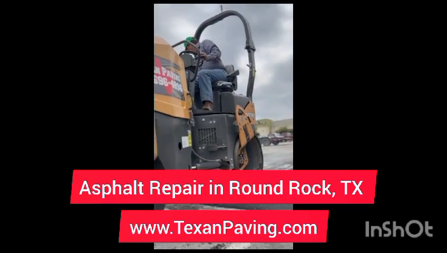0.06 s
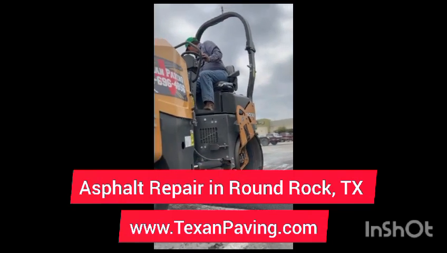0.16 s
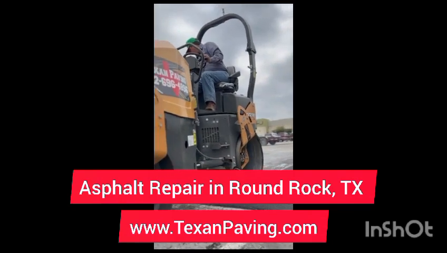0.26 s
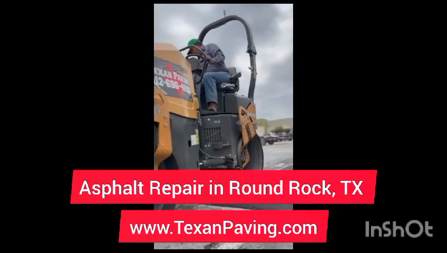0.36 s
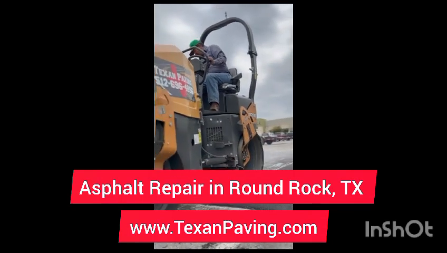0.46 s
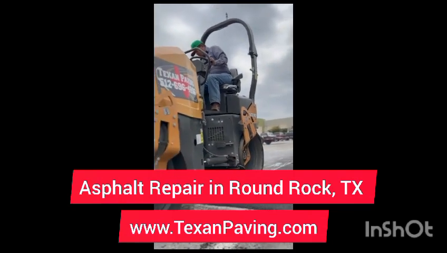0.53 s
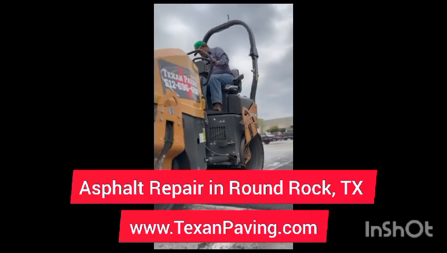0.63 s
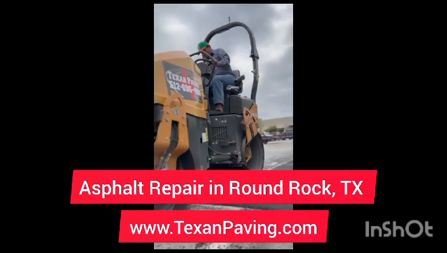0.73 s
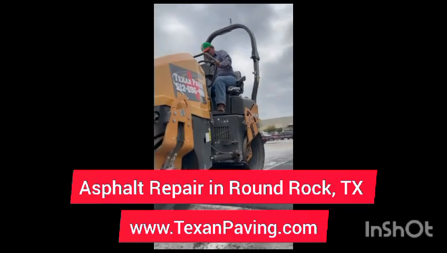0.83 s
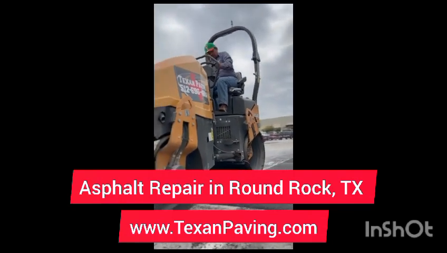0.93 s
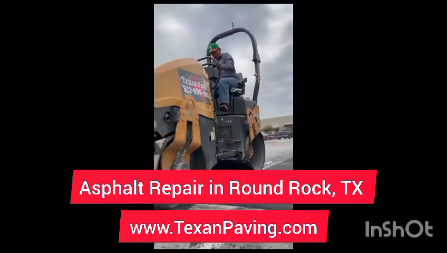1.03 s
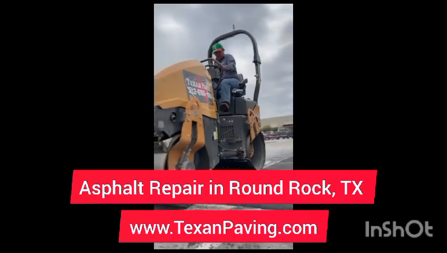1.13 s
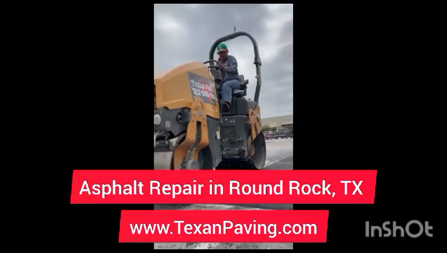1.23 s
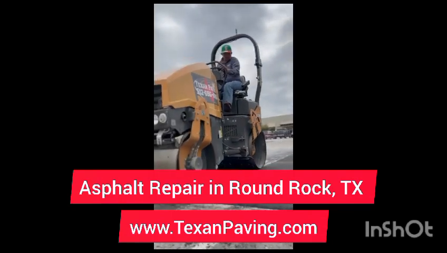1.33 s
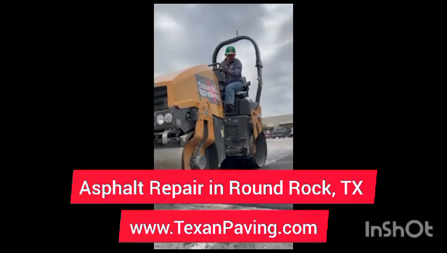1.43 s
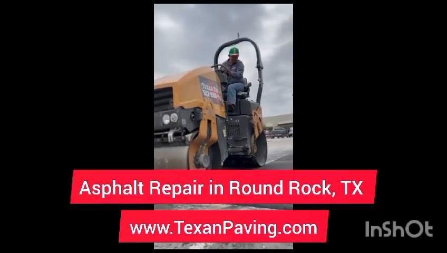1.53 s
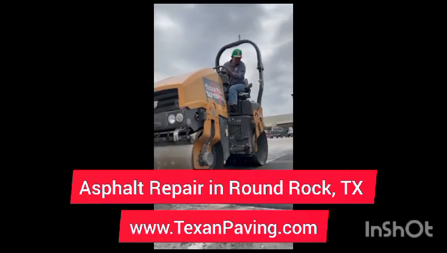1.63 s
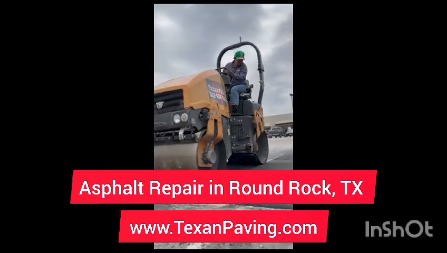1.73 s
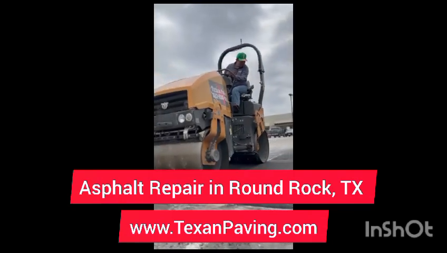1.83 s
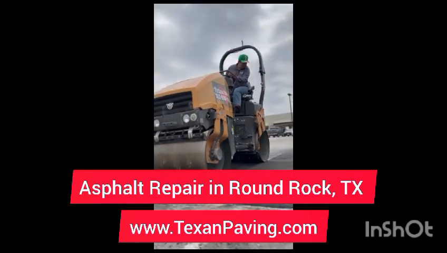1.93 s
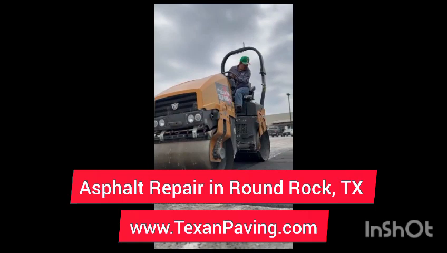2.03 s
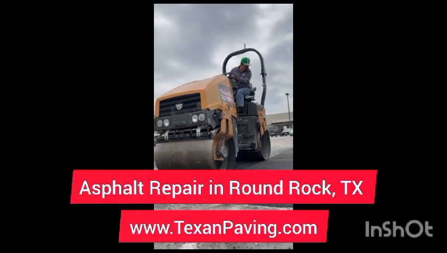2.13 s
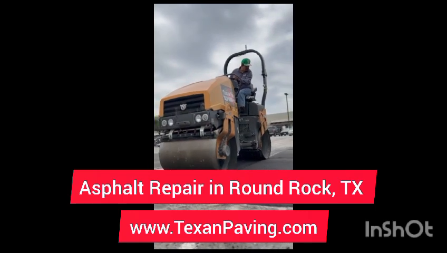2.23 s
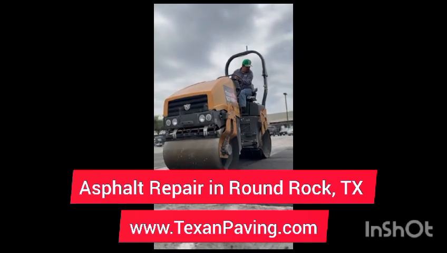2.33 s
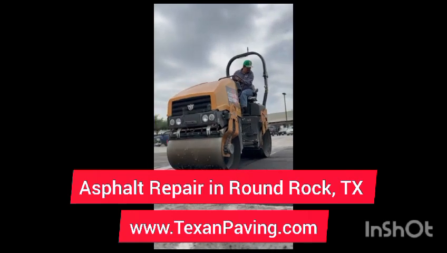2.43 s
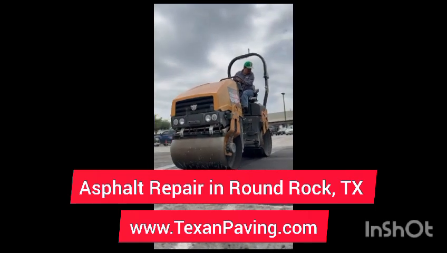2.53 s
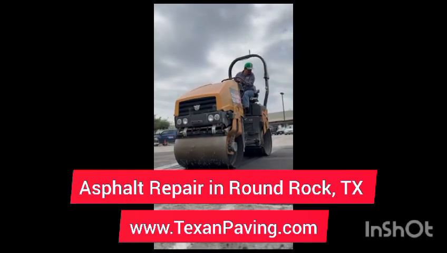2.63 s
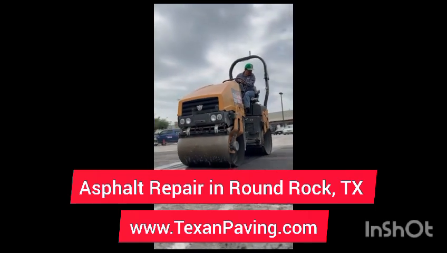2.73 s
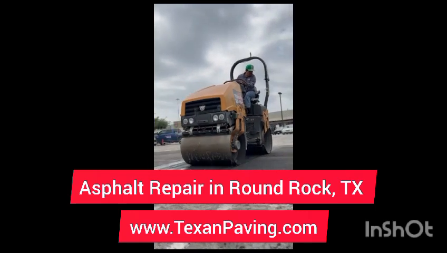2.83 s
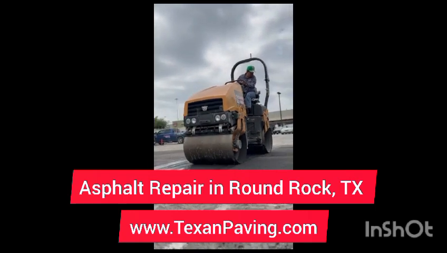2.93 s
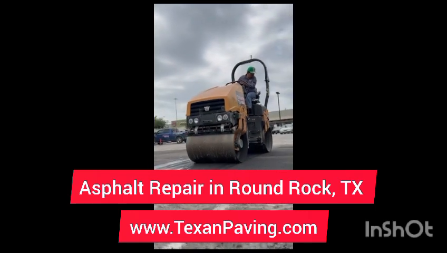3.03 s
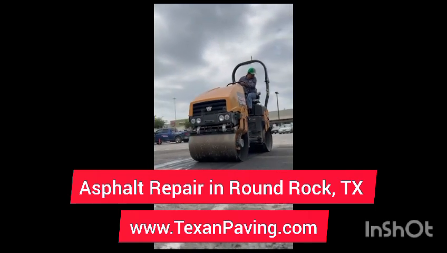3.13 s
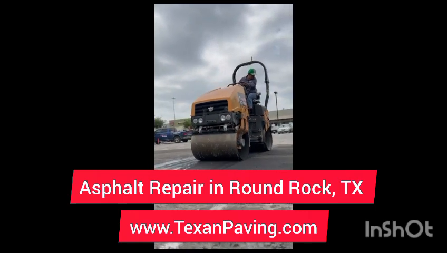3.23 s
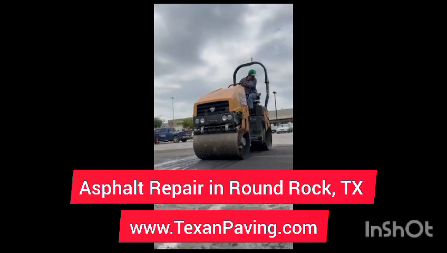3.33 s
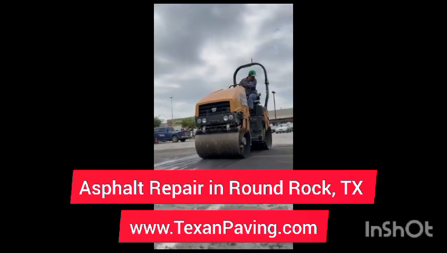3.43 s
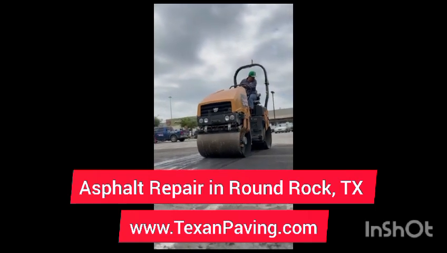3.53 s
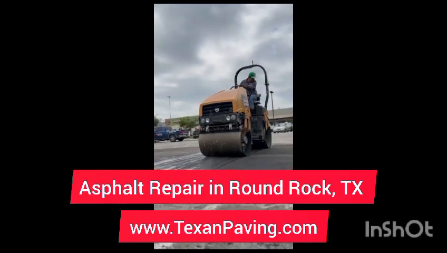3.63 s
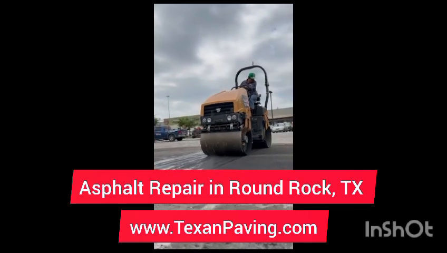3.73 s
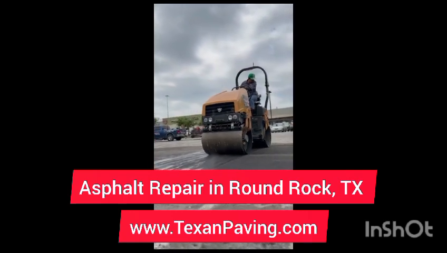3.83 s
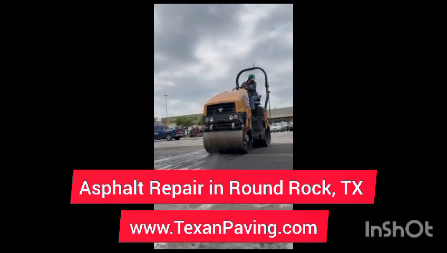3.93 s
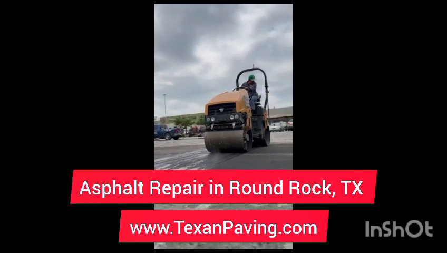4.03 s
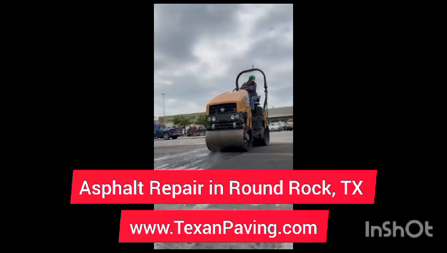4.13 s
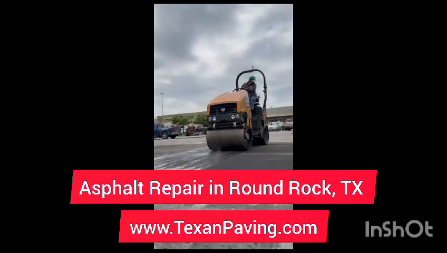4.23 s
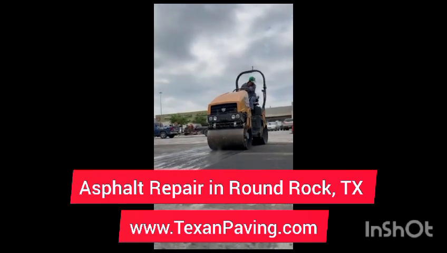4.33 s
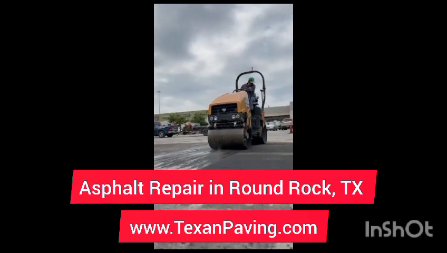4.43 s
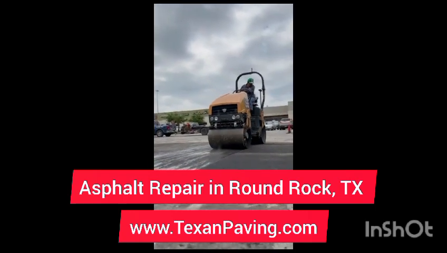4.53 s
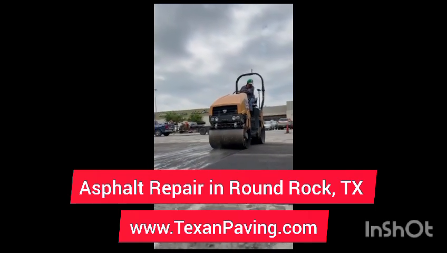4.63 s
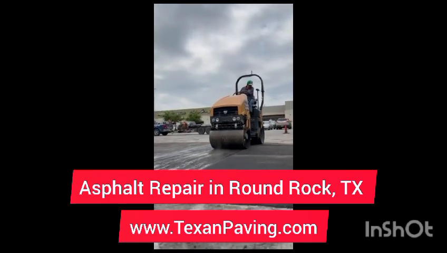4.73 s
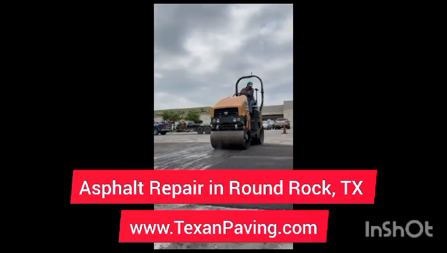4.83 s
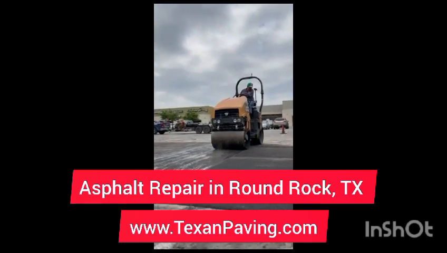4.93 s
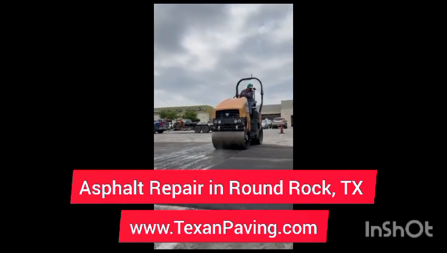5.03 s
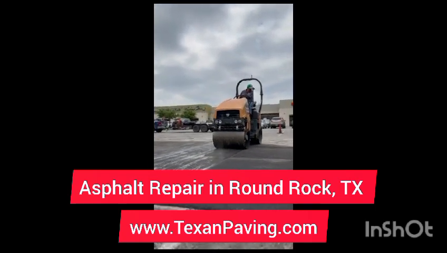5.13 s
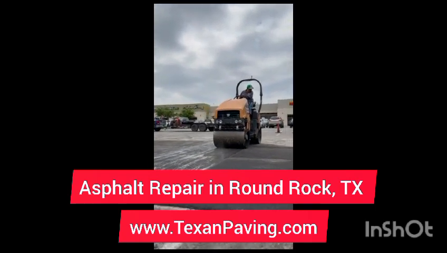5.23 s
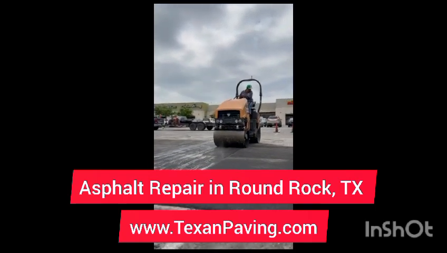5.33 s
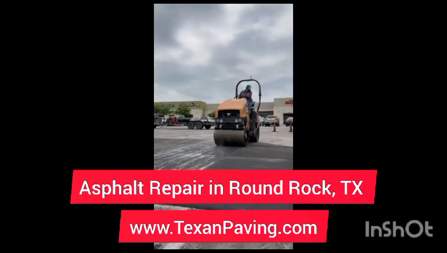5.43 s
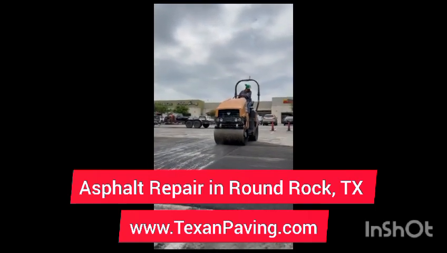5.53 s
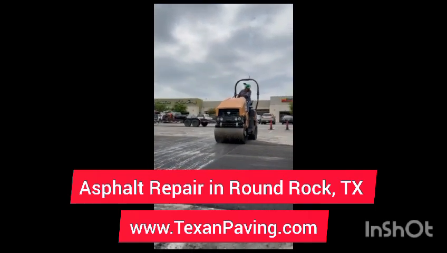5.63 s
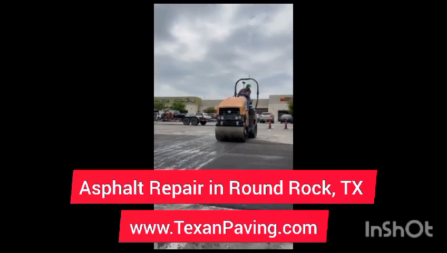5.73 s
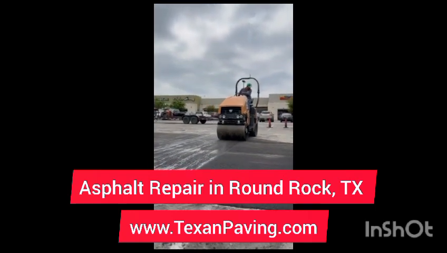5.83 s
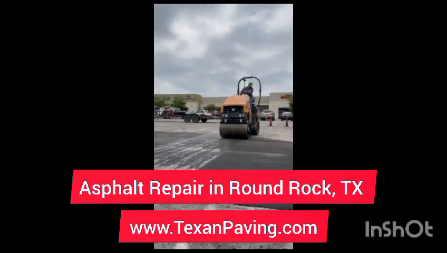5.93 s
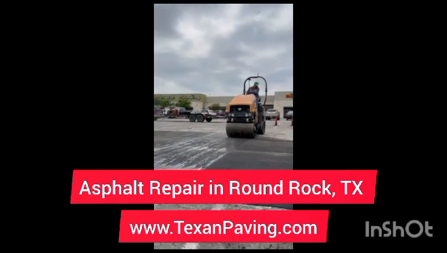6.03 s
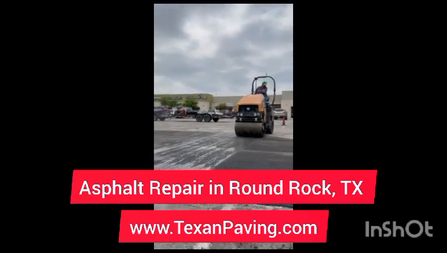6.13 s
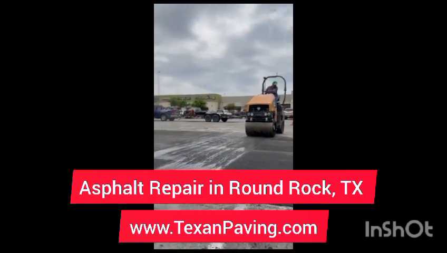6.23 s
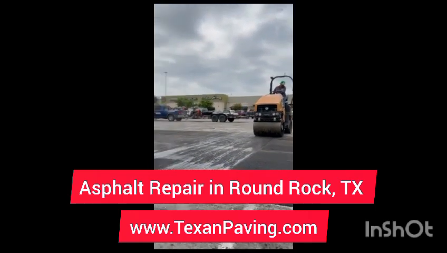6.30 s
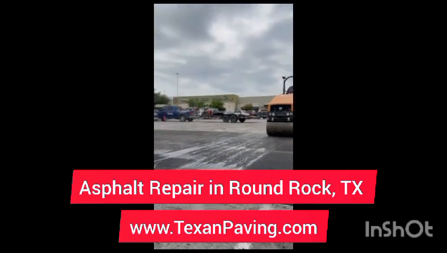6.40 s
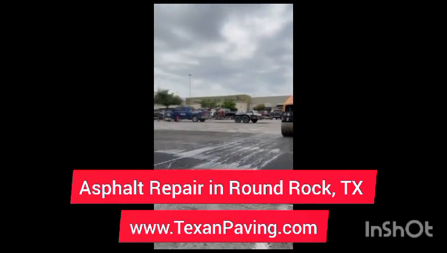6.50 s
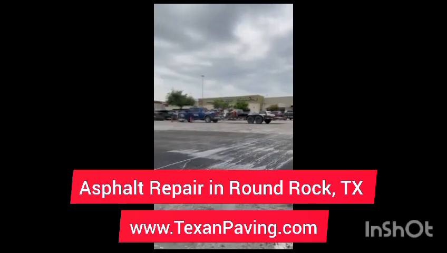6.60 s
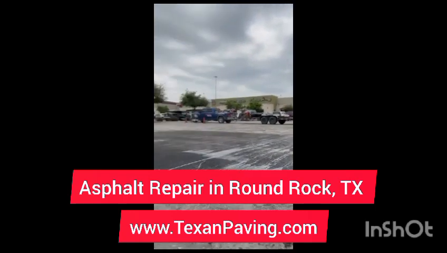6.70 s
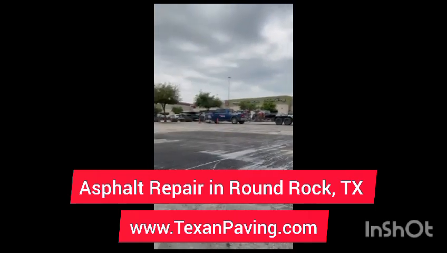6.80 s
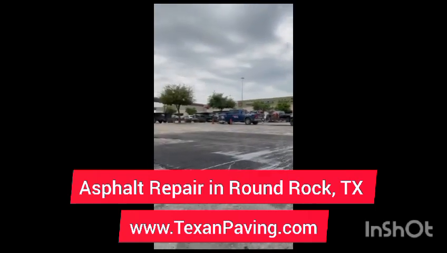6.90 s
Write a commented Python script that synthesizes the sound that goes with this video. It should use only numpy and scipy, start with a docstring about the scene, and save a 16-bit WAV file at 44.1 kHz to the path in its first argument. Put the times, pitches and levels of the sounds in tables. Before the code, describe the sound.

Loud clattering diesel hum and pump whine give way to knocks, a rising drum rumble and a deep pulsing throb outdoors.

```python
"""A diesel road roller idles beside two microphones with its drive pump whining loudly.
Its engine rate droops under load, it backs away, the front vibrating drum runs up amid knocks and
the rear drum's thump joins in; engine and drum tones beat into a throb over clatter and a noisy roar.
Late on, the rear drum meets stiff ground, panels buzz harder and passing tones sound.
Tones are summed cosines, the rest is shaped noise and short rings; another machine drones throughout."""
import sys
import numpy as np
from scipy import signal
from scipy.fft import rfft, irfft
from scipy.io import wavfile
from scipy.ndimage import uniform_filter1d

SR = 44100
rng = np.random.default_rng(int(sys.argv[2]) if len(sys.argv) > 2 else 0)


def transcribe(u):
    """Save the signal u as a 16-bit wav file named by the first command-line argument.

    u: samples, shape (n,) or (channels, n), limited to [-1, 1]; the rate is SR.
    q: integer samples, one column per channel.
    """
    v = np.clip(np.atleast_2d(u).T, -1, 1)
    q = np.round(v * 32767).astype(np.int16)
    wavfile.write(sys.argv[1], SR, q)


N = 306936


def undb(db):
    """Turn decibels into a plain factor."""
    return 10 ** (np.asarray(db) / 20)


def joined_db(*levels_db):
    """Level in dB when the plain factors of several levels are added."""
    return 20 * np.log10(sum(undb(db) for db in levels_db))


def curves(table):
    """Columns of a table after its time column, one value a sample."""
    s, *columns = np.transpose(table)
    return [np.interp(np.arange(N) / SR, s, column) for column in columns]


def ramp(start, end):
    """Rise from 0 to 1 between two times in seconds."""
    return np.clip((np.arange(N) / SR - start) / (end - start), 0, 1)


def on_bins(points):
    """Read (Hz, value) points at every frequency bin of the spectrum."""
    hz, value = np.transpose(points)
    bin_hz = np.arange(N // 2 + 1) * SR / N
    return np.interp(np.log(bin_hz + 1), np.log(hz + 1), value)


def walk(rate):
    """Slow random curve: values held for 1 / rate seconds and smoothed twice; spread near 1."""
    k = int(SR / rate)
    steps = np.repeat(rng.standard_normal(N // k + 1), k)
    return 1.305 * uniform_filter1d(uniform_filter1d(steps, k), k)[:N]


def tone(turns, db):
    """Cosine at an rms level in dB; one turn is one wave."""
    return np.sqrt(2) * undb(db) * np.cos(2 * np.pi * turns)


def coloured(points):
    """Noise of rms 1 with the given spectrum."""
    noise = irfft(rfft(rng.standard_normal(N)) * undb(on_bins(points)), N)
    return noise / noise.std()


def band(x, lo_hz, hi_hz):
    """Let through mainly what lies between two frequencies."""
    return signal.sosfilt(signal.butter(1, [lo_hz, hi_hz], "band", fs=SR, output="sos"), x)


START_M, LEAVES_S, SPEED_M_S = 2.51, 0.72, 2.25  # nearest distance, start of the move, speed


def distance_loss():
    """Sound spreads out with distance: dB lost as the machine backs away."""
    away = SPEED_M_S * np.maximum(np.arange(N) / SR - LEAVES_S, 0)
    return 20 * np.log10(np.hypot(START_M, away) / START_M)


# the engine slows as the load comes on: (time [s], firing rate [Hz])
FIRING_RATE = [(0, 52.18), (.68, 52.24), (.82, 50.84), (1.3, 51.55), (1.55, 52.21), (1.9, 52.53),
               (2.4, 52.48), (3.4, 52.4), (5.4, 52.33), (5.9, 52.22), (6.96, 52.31)]
# off-centre weight that spins up, overshoots and settles: (time [s], turning rate [Hz])
FRONT_WEIGHT = [(1, 30.65), (1.1, 33.5), (1.3, 48.33), (1.4, 50.51), (1.6, 59.3), (1.72, 56.58),
                (1.9, 57.24), (3.3, 57.48), (4.3, 57.29), (5.3, 57.15), (6.96, 56.85)]
# slower weight: (time [s], turning rate [Hz])
REAR_WEIGHT = [(1.3, 51.49), (1.7, 52.16), (2, 50.17), (2.3, 51.19), (3.5, 50.86), (4.7, 50.65),
               (5.5, 50.76), (5.7, 49.2), (6.1, 50.0), (6.3, 49.52), (6.96, 50.1)]


def running_speeds():
    """Rates of the engine firings and of the spinning weights that shake the drums."""
    return [curves(table)[0] for table in (FIRING_RATE, FRONT_WEIGHT, REAR_WEIGHT)]


# deep noise: (frequency [Hz], relative density [dB])
RUMBLE_COLOUR = [(20, 3), (35, 8), (70, 13.5), (130, 7.5), (200, 4), (300, -26.5)]
RUMBLE_DB = -27.5


def rumble():
    """Deep noise whose level wavers a little."""
    return undb(RUMBLE_DB + 0.34 * walk(5.3)) * coloured(RUMBLE_COLOUR)


DRONE_HZ = 46.1
# tones of the drone: (multiple of the drone rate [1])
FAR_MULTIPLES = (3, 4, 5, 9, 11, 20)
# their mean levels: (level [dB])
FAR_DB = (-44, -38.5, -38, -44, -47, -55.5)


def far_drone():
    """Another machine turns steadily and sounds several multiples of its rate."""
    turns = np.cumsum(DRONE_HZ * (1 + 0.002943 * walk(1.5))) / SR
    return sum(tone(multiple * turns + rng.random(), db + 1.5 * walk(2.385))
               for multiple, db in zip(FAR_MULTIPLES, FAR_DB))


# (start [s], end [s], start pitch [Hz], end pitch [Hz], level [dB], waver [dB])
PASSING_TONES = [(5.68, 6.17, 419, 416, -35, 3), (6.25, 6.5, 418, 416, -37, 3),
                 (6.33, 6.95, 690, 730, -39, 5), (6.54, 6.84, 1292, 1300, -37.5, 2),
                 (6.66, 6.98, 505, 503, -36, 3), (6.68, 6.98, 420, 418, -36, 3)]


def passing_tones():
    """Thin gliding tones that come and go, unsteady in pitch and level."""
    t, out = np.arange(N) / SR, 0
    for start, end, hz, end_hz, db, waver_db in PASSING_TONES:
        pitch = hz + (end_hz - hz) * ramp(start, end) + 0.00588 * hz * walk(14)
        to_edge = np.minimum(t - start, end - t)
        fade = np.clip(to_edge / (0.22 * (end - start)), 0, 1)
        out = out + tone(np.cumsum(pitch) / SR, db + waver_db * walk(25)) * fade
    return out


# (start pitch [Hz], end pitch [Hz], width [Hz], level [dB], loudest time [s], fade [s])
ROUGH_WHINES = [(1590, 1640, 120, -33, 1.03, 0.15), (2016, 2100, 140, -37, 1.4, 0.249),
                (1796, 1870, 50, -37, 1.5, 0.246), (1078, 1150, 90, -39, 1.4, .4),
                (1810, 1780, 60, -41, 2.4, 0.47), (2076, 2095, 30, -42, 2.8, .5),
                (1364, 1390, 50, -40, 3.3, 0.66), (1226, 920, 56, -42, 2.3, 0.32),
                (1836, 1700, 90, -41.5, 4.4, .5), (1822, 1700, 120, -44, 5.3, 0.39),
                (1288, 1290, 40, -42, 5.15, 0.27), (3500, 3550, 250, -44, 2.5, 1.1),
                (2490, 2480, 150, -45.5, 2.5, 1.5), (185.3, 170, 27, -28.5, 5.9, 0.37),
                (250, 270, 30, -35, 6.4, 0.17), (559, 640, 90, -36, 6.4, .5),
                (705, 720, 70, -35, 6.45, 0.567)]


def whines():
    """Rough whines out of the roar: gliding tones shaken by slow noise as wide as their band."""
    t, out = np.arange(N) / SR, 0
    for hz, end_hz, width_hz, db, s, fade in ROUGH_WHINES:
        turns = np.cumsum(hz + (end_hz - hz) * ramp(s - fade, s + fade)) / SR
        shaken = walk(width_hz) * np.cos(2 * np.pi * turns) + walk(width_hz) * np.sin(2 * np.pi * turns)
        out = out + shaken * undb(db - 9 * ((t - s) / fade) ** 2)
    return out


# how much of the clatter returns each engine cycle: (frequency [Hz], share [0 to 1])
RECURRING_SHARE = [(250, .5), (400, .8), (570, .75), (620, .25), (800, .4), (900, .75), (1500, .75),
                   (1900, .4), (5000, .4)]


def cycle_noise(firing):
    """Spectrum of noise that partly recurs every three firings; the recurring pattern slowly changes."""
    size = 2530  # samples in the pattern
    place = (firing / 3 % 1 * size).astype(int)
    drift = np.pi * .7 * np.arange(N) / SR
    pattern = rng.standard_normal((2, size))[:, place]
    recurring = np.cos(drift) * pattern[0] + np.sin(drift) * pattern[1]
    share = on_bins(RECURRING_SHARE)
    return np.sqrt(share) * rfft(recurring) + np.sqrt(1 - share) * rfft(rng.standard_normal(N))


ROAR_DB, ROAR_LOSS = -27, 0.65  # before distance, at 1.5 kHz; share of the distance loss
LOW_LOSS, HISS_LOSS = -0.39, 0.23  # extra shares of the loss at 500 Hz and 4 kHz
WIND_UP_S, WIND_UP_DB = (0, 1.78), -4  # the roar grows as the machine sets off
# top treble over the roar: (time [s], level [dB])
TOP_TREBLE = [(0, 5), (1.6, 2.5), (4.1, 2.5), (4.8, -8), (5.2, 0), (5.65, -19), (6.1, -3.5), (6.96, 6)]


def roar_levels(loss_db):
    """Whole roar, then extra changes of its low, hiss and top parts, as they fade unequally."""
    whole = ROAR_DB + WIND_UP_DB * (1 - ramp(*WIND_UP_S)) - ROAR_LOSS * loss_db
    return whole, -LOW_LOSS * loss_db, -HISS_LOSS * loss_db, curves(TOP_TREBLE)[0]


# roar of the engine bay at the side: (frequency [Hz], relative density [dB])
BAY_COLOUR = [(150, -28.5), (250, 0.5), (400, -5), (520, -16), (750, 2), (1000, -11.5), (1850, -11),
              (3100, -14.5), (3600, -25.5), (5000, -26), (5900, -27), (7800, -19), (8800, -38),
              (11500, -65)]
# roar of the grille in front: (frequency [Hz], relative density [dB])
GRILLE_COLOUR = [(150, -18), (250, -1.5), (370, -5), (520, -3.5), (870, -14.5), (1100, -10.5), (1850, -10),
                 (2500, -15.5), (3100, -19), (3600, -20.5), (5000, -24.5), (5900, -22.5), (7800, -28.5),
                 (8800, -29.5), (11500, -53)]
TURN_S = (1, 3.2)  # the machine swings from side-on to face-on
CLATTER_LAG = .13  # turns by which the clatter slips from one octave to the next
SLOW_SWELL_DB = (1.2, .4)  # slow swell below 1.5 kHz and in the treble


def roar(firing, db, low_db, hiss_db, top_db):
    """Fan and rolling noise in bands that swell apart; clatter pulses with each firing."""
    noise = cycle_noise(firing)
    octaves = np.log2(np.arange(len(noise)) * SR / N + 1)
    side, front = undb(on_bins(BAY_COLOUR)), undb(on_bins(GRILLE_COLOUR))
    facing = ramp(*TURN_S)
    # one cylinder of three knocks harder
    harder = undb(2.5 * np.cos(2 * np.pi * firing / 3))
    out = 0
    for octave in np.arange(7.5, 14, .5):
        share = np.clip(1 - 2 * abs(octaves - octave), 0, 1)
        swing_db = 20 * np.log10(np.sum(share * side) / np.sum(share * front))
        # how far this band counts as low, hiss or top; 1.5 kHz is the neutral middle
        low, hiss, top = (np.interp(octave, np.log2([500, 1500, 4000, 8000]), np.eye(4)[k])
                          for k in (0, 2, 3))
        level_db = (1 - facing) * swing_db + low * low_db + hiss * hiss_db + top * top_db
        level_db += np.interp(hiss + top, (0, 1), SLOW_SWELL_DB) * walk(1.52)
        level_db += (1.58 + 1.8 * top) * walk(9)
        beat = harder * np.exp(-((firing + CLATTER_LAG * octave) % 1) / 0.38)
        clatter = 1 + (.35 - 0.13 * low - 0.05 * hiss + 0.11 * top) * beat
        out = out + irfft(noise * share * front, N) * undb(level_db) * clatter
    return out * undb(db + 20.0)


# panels that buzz as they are shaken: at rest, per Hz of engine droop, share of the distance loss
BUZZ_DB, BUZZ_DB_PER_HZ, BUZZ_LOSS = -28, 8.5, 0.49
FRAME_HZ = 42.8  # the frame shakes most at this drum rate
BUZZ_FRAME_DB, BUZZ_WIDTH_HZ = -4.5, 2.53
BUZZ_STIFF_DB, BUZZ_STIFF_S = -23.5, (5.6, 6.08)  # they join in a little after the ground stiffens


def buzz_level(droop, front_hz, loss_db):
    """Panels are shaken by the labouring engine, the frame resonance and the stiff ground."""
    labouring = BUZZ_DB + BUZZ_DB_PER_HZ * droop - BUZZ_LOSS * loss_db
    resonance = BUZZ_FRAME_DB - ((front_hz - FRAME_HZ) / BUZZ_WIDTH_HZ) ** 2
    stiff = BUZZ_STIFF_DB - 30 * (1 - ramp(*BUZZ_STIFF_S))
    return joined_db(labouring, resonance, stiff)


# resonances of the sheets: (frequency [Hz], width [Hz], relative level [dB])
SHEETS = [(179, 85, 2), (433, 90, -2.5), (564, 130, -1.5), (711, 52, 3.5), (805, 230, -7.5),
          (1070, 280, -8.5)]


def panels(shake, buzz_db):
    """Loose sheet metal rung by a burst of noise at each drum blow."""
    burst = 0.25 + np.exp(-(shake % 1) / 0.29)
    blows = rng.standard_normal(N) * burst * undb(buzz_db + 1.7 * walk(13))
    blows = signal.sosfilt(signal.butter(2, 1300, fs=SR, output="sos"), blows)
    return sum(undb(db) * band(blows, hz - width / 2, hz + width / 2) for hz, width, db in SHEETS)


# single blows: (time [s], relative level [dB])
FRAME_KNOCKS = [(1.059, -20), (1.116, -19), (1.135, -21), (1.184, -17), (1.232, -9), (1.27, -16),
                (1.292, -11), (1.33, -14), (1.388, -18), (3.564, -19)]
# ringing of the frame: (frequency [Hz], relative level [dB])
FRAME_RING = [(725, 4.5), (966, -16), (518, -0.5)]
KNOCK_RISE_S, KNOCK_DECAY_S = 0.00062, .004


def knocks():
    """Single blows on the frame: a short ring of a few cycles, its pitch a little different each time."""
    out, t = np.zeros(N), np.arange(2000) / SR
    for s, db in FRAME_KNOCKS:
        i = int(s * SR)
        ring = sum(undb(mode_db) * np.sin(2 * np.pi * hz * (1 + 0.037 * rng.standard_normal()) * t)
                   for hz, mode_db in FRAME_RING)
        shape = np.exp(-t / KNOCK_DECAY_S) * (1 - np.exp(-t / KNOCK_RISE_S))
        out[i:i + len(t)] += undb(db) * ring * shape
    return out


# parts struck once in three firings:
# (pitch [Hz], moment [share of cycle], level over the roar [dB], loudest time [s], fade [s])
STRUCK_PARTS = [(470, .23, -1, 3.2, 3), (540, .45, -3, 3, 2.5), (950, .84, -3, 3.2, 2),
                (1088, .42, 1, 2.7, 2), (1420, .02, -2, 3.4, 1.3), (1790, .7, -5, 2.4, .8),
                (2550, .24, -11, 3, 2.5), (2300, .7, -11, 2.8, 1.5), (3500, .5, -14, 2.5, 1.5),
                (1450, .02, -6, .3, 1), (1200, .32, -5, .3, 1), (1050, .68, -5, .3, 1),
                (700, .3, 2, .85, .2), (710, .6, 3, 6.6, .5)]
STRUCK_RISE_S = .0045


def struck_parts(firing, firing_hz, roar_db):
    """Engine parts ring briefly every engine cycle, each blow a little different."""
    t, out = np.arange(N) / SR, 0
    for hz, share, db, s, fade in STRUCK_PARTS:
        cycle = firing / 3 - share
        since = cycle % 1 * 3 / firing_hz  # seconds since the blow
        blow_db = 2.2 * rng.standard_normal(N // 1000)[np.floor(cycle).astype(int)]
        ring = since / STRUCK_RISE_S * np.exp(1 - since / STRUCK_RISE_S)
        out = out + ring * tone(hz * since, db + roar_db + blow_db - 9 * ((t - s) / fade) ** 2)
    return out


STROKES = 12  # piston strokes: per engine firing in the pump, per turn of the front weight in the motor
# pump stroke tone, octave and twelfth, loud at standstill:
# (level [dB], fade start [s], fade end [s], level after [dB])
DRIVE_PUMP = [(-25.5, 0.7, 1.3, -46.5), (-32.5, 0.011, 0.45, -52.5), (-29, 0.55, 1.06, -55.5)]


def drive_pump(firing):
    """The drive pump whines at twelve strokes a firing and at multiples of that."""
    whine = 0
    for k, (db, start, end, after) in enumerate(DRIVE_PUMP):
        level_db = db + (after - db) * ramp(start, end) + 0.73 * walk(22)
        whine = whine + tone(STROKES * (k + 1) * firing, level_db)
    # the crank surges at each firing, which puts side tones round the whine
    return whine * (1 + 0.36 * np.cos(2 * np.pi * firing))


SECOND_DB, SECOND_LOSS = -13, 0.84  # before distance; share of the distance loss
THIRD_DB, THIRD_DB_PER_HZ = -35, 3.5  # the third tone grows with the droop
# lowest engine tone: (time [s], level [dB])
FIRST_LEVEL = [(0, -27), (.82, -20), (1.3, -20), (1.55, -21), (1.9, -27), (2.9, -26.5), (3.4, -31),
               (4.9, -29), (6.96, -29)]


def engine_levels(droop, loss_db):
    """Levels of the three low engine tones, from load and distance."""
    second = SECOND_DB - SECOND_LOSS * loss_db
    return curves(FIRST_LEVEL)[0], second, THIRD_DB + THIRD_DB_PER_HZ * droop


START_TURNS, ROCK_LAG = -.074, 0.17  # firing turns at the start; turns by which the first tone trails
VIEW_S, UPPER_WAVER_DB = (.7, 2.1, 3.498, 6), 2.5  # times of the four views below
# upper tones as the machine shows different sides:
# (multiple of firing rate [1], side-on [dB], turning [dB], face-on [dB], far [dB])
UPPER_TONES = [(4, -33, -31.5, -33, -37), (13 / 3, -50.5, -47, -42.5, -39.5), (5, -36.5, -44.5, -46.5, -41),
               (6, -32, -43, -42.5, -51), (19 / 3, -43, -44, -46.5, -47), (7.5, -57, -39.5, -51, -57),
               (8, -50, -39, -39, -41), (9, -46.5, -46, -46, -48.5), (11, -53.5, -41, -45.5, -46),
               (32 / 3, -45, -45.5, -48.5, -55), (13, -42.5, -43, -62, -59.5), (14, -37, -48, -65, -58),
               (14, -44, -47, -58, -60), (16, -52, -39, -50, -52.5), (18, -41, -44.5, -40.5, -53),
               (62 / 3, -51, -39.5, -54.5, -61), (23, -60, -47.5, -47.5, -58.5),
               (27.5, -53, -52, -43.5, -65), (33.5, -51, -48.5, -48, -57), (34, -45.5, -58, -57, -56),
               (110 / 3, -45, -62, -55, -53.5), (36.5, -67, -36.5, -58, -56)]


def engine(firing, first_db, second_db, third_db):
    """Exhaust tones; each upper one swells while the part that radiates it faces the listener."""
    t = np.arange(N) / SR
    low = tone(firing - ROCK_LAG, first_db) + tone(2 * firing, second_db) - tone(3 * firing, third_db)
    upper = sum(tone(k * firing + rng.random(), np.interp(t, VIEW_S, db) + UPPER_WAVER_DB * walk(8))
                for k, *db in UPPER_TONES)
    return low + upper


MOTOR_STARTS_S = (1.3, 1.5)
MOTOR_DB, MOTOR_OCTAVE_DB, MOTOR_LOSS = -39, -43, .75  # before strain and distance; loss share
MOTOR_WAVER = .06  # turns by which the tone wanders
# the motor sings out: (time [s], half length [s], added stroke tone [dB], added octave [dB])
STRAINS = [(1.47, .06, 4, 8), (1.69, .17, 13, 1), (1.78, .09, 0, 6), (3.5, .4, 8, 1)]


def drum_motor(front, loss_db):
    """The hydraulic motor of the front drum sings at its piston strokes, more when strained."""
    t = np.arange(N) / SR
    running = -25 * (1 - ramp(*MOTOR_STARTS_S)) - MOTOR_LOSS * loss_db
    strain = sum(np.outer(db, np.exp(-((t - s) / half) ** 4)) for s, half, *db in STRAINS)
    levels_db = MOTOR_DB + running + strain[0], MOTOR_OCTAVE_DB + running + strain[1]
    return sum(tone((k + 1) * (STROKES * front + MOTOR_WAVER * walk(30)), db + 3.0 * walk(14))
               for k, db in enumerate(levels_db))


FRONT_DB, FRONT_LOSS = -13, 0.36  # before distance; share of the distance loss
LIFT_HZ, LIFT_DB_PER_HZ = 50.6, 1.5  # the thump is full above this speed, weaker below it
FRONT_OCTAVE_DB, OCTAVE_LOSS = -26.5, 0.87
BOUNCE_S, BOUNCE_DB, BOUNCE_FADE_S = 1.3, 5.5, 0.84  # the drum bounces hard at first
# octave while passing the frame resonance
FRAME_OCTAVE_DB, FRAME_OCTAVE_WIDTH_HZ = -18.5, 2


def front_levels(hz, loss_db):
    """Thump and octave of the front drum: slow turning thumps weakly, bouncing adds the octave."""
    since = np.arange(N) / SR - BOUNCE_S
    thump = FRONT_DB - LIFT_DB_PER_HZ * np.maximum(LIFT_HZ - hz, 0) - FRONT_LOSS * loss_db
    extra_db = BOUNCE_DB * np.exp(-np.maximum(since, 0) / BOUNCE_FADE_S)
    bounce = FRONT_OCTAVE_DB + extra_db - OCTAVE_LOSS * loss_db
    bounce -= 400 * np.maximum(-since, 0)  # rises steeply until the bounce begins
    resonance = FRAME_OCTAVE_DB - ((hz - FRAME_HZ) / FRAME_OCTAVE_WIDTH_HZ) ** 2
    return thump, joined_db(bounce, resonance)


FRAME_WIDTH_HZ = 6.2


def front_drum(front_hz, front, thump_db, octave_db):
    """A spinning weight thumps the front drum on the ground once a turn."""
    thump = tone(front, thump_db) - tone(2 * front, octave_db)
    # the frame shudders while the weight runs up through its resonance
    shudder_db = -28 - 12 * np.minimum(abs(front_hz - FRAME_HZ) / FRAME_WIDTH_HZ, 3) ** 2
    return thump + tone(3 * front, shudder_db) + tone(4 * front, shudder_db + 0.5)


REAR_STARTS_S, REAR_QUIET_DB, REAR_LOSS = (1.5, 1.6), -46, 0.35  # added before the start; loss share
SOFT_GROUND_DB = (-19, -45.5, -49)  # tone, octave, twelfth
STIFF_GROUND_DB = (-22.5, -23.5)  # tone, octave
# the twelfth wavers on stiff ground: (time [s], level [dB])
STIFF_TWELFTH_LEVEL = [(5.5, -47), (5.516, -27), (5.58, -22), (5.608, -28), (5.922, -21), (5.978, -49),
                       (5.988, -25), (6.02, -22), (6.248, -19.5), (6.288, -27), (6.45, -20), (6.492, -27),
                       (6.532, -22), (6.96, -23.5)]


def rear_levels(stiff, loss_db):
    """Tone, octave and twelfth of the rear drum: stiff ground hardens its blows."""
    hard_db = (*STIFF_GROUND_DB, *curves(STIFF_TWELFTH_LEVEL))
    first, *upper = (soft + stiff * (hard - soft) for soft, hard in zip(SOFT_GROUND_DB, hard_db))
    return [first + REAR_QUIET_DB * (1 - ramp(*REAR_STARTS_S)) - REAR_LOSS * loss_db, *upper]


def rear_drum(rear, first_db, octave_db, twelfth_db):
    """A slower weight thumps the rear drum once a turn; harder blows hold more upper tones."""
    thump = tone(rear, first_db) + tone(2 * rear, octave_db + 2.3 * walk(13))
    thump -= tone(3 * rear + .035 * walk(9), twelfth_db + .6 * walk(9))
    return thump + sum(tone(k * rear, twelfth_db - 3.7 * k + 1.3 * walk(19)) for k in range(4, 7))


# no lead and no tilt in the bass: (frequency [Hz], lead or tilt [rad or dB])
EQUAL_BASS = [(20, 0), (240, 0)]
# (frequency [Hz], phase by which left leads [rad])
LEFT_LEAD = [(330, .5), (780, .9), (1210, .2), (2330, .1), (2600, .6), (2950, 2.0), (3450, 5.6),
             (4050, 5.8), (4650, 3.8), (5000, 3.3), (5400, 6.3), (6720, 6.1), (8440, 4.0), (8960, 3.3),
             (11200, 3.1)]
# (frequency [Hz], left minus right [dB])
LEFT_TILT = [(340, 0), (610, 3), (1090, 6.5), (1940, 1), (3460, 5), (6170, -0.5), (11000, 1)]
# unrelated sound: (frequency [Hz], gain [dB])
SCATTER_GAIN = [(220, -40), (300, -12), (1000, -8), (2300, -5), (3100, 2.5), (4000, 2), (4900, 2),
                (6000, -4), (9000, -5)]


def two_ports(direct, scattered):
    """Two microphone ports hear the machine with their own lead and tilt."""
    port = np.exp(.5j * on_bins(EQUAL_BASS + LEFT_LEAD)) * undb(on_bins(EQUAL_BASS + LEFT_TILT) / 2)
    # scattered sound reaches them a quarter turn apart and fills the dips between them
    near, wide = rfft(direct), rfft(scattered) * undb(on_bins(SCATTER_GAIN))
    return np.array([irfft(near * port + wide, N), irfft(near / port + 1j * wide, N)])


IDLE_HZ = 52.78  # firing rate from which the droop counts
STIFF_S = (5.38, 5.65)  # the rear drum rolls on to stiff ground


def scene():
    """Run engine and drums from their speeds, add every layer and hear it at two ports."""
    firing_hz, front_hz, rear_hz = running_speeds()
    firing, front, rear = (np.cumsum(hz) / SR for hz in (firing_hz, front_hz, rear_hz))
    firing += START_TURNS
    loss_db, stiff, droop = distance_loss(), ramp(*STIFF_S), np.maximum(IDLE_HZ - firing_hz, 0)
    rear_db, roar_db = rear_levels(stiff, loss_db), roar_levels(loss_db)
    buzz_db = buzz_level(droop, front_hz, loss_db)
    # the rear drum shakes the panels once it is loud enough, the front one before
    shake = np.where(rear_db[0] > -35, rear, front)
    direct = rumble() + far_drone() + passing_tones() + whines()
    direct += roar(firing, *roar_db) + panels(shake, buzz_db)
    direct += knocks() + struck_parts(firing, firing_hz, roar_db[0])
    direct += drive_pump(firing) + engine(firing, *engine_levels(droop, loss_db))
    direct += drum_motor(front, loss_db) + rear_drum(rear, *rear_db)
    direct += front_drum(front_hz, front, *front_levels(front_hz, loss_db))
    # roar and panels again, from fresh noise
    scattered = roar(firing, *roar_db) + panels(shake, buzz_db)
    return two_ports(direct, scattered)


TOP_HZ = 11600


def record(dry):
    """The microphones round the loudest peaks and cut the top."""
    rounded = np.tanh(0.77 * dry) / 0.73
    return signal.sosfilt(signal.ellip(8, .2, 70, TOP_HZ, fs=SR, output="sos"), rounded)


dry = scene()
out = record(dry)
transcribe(out)
```